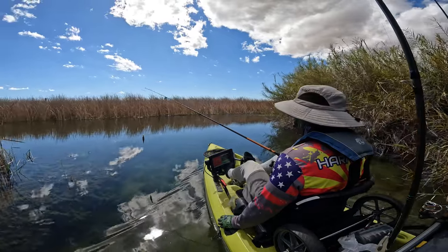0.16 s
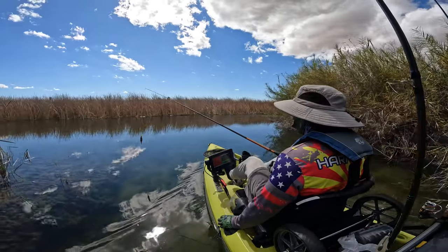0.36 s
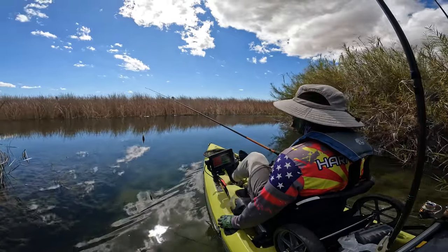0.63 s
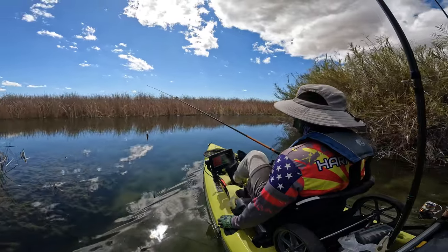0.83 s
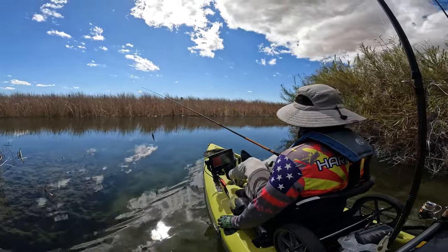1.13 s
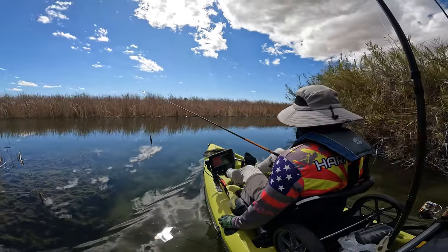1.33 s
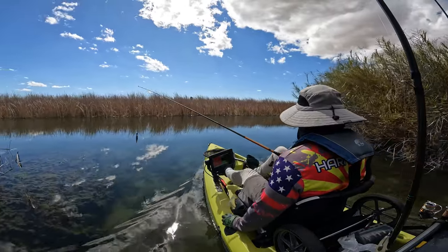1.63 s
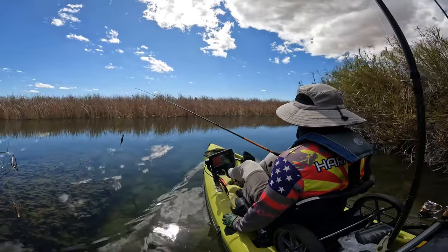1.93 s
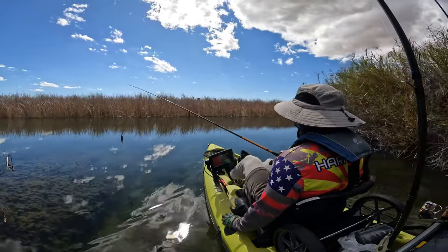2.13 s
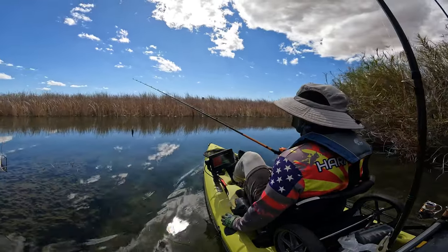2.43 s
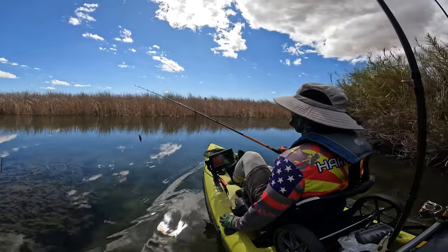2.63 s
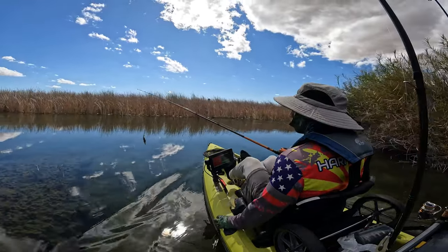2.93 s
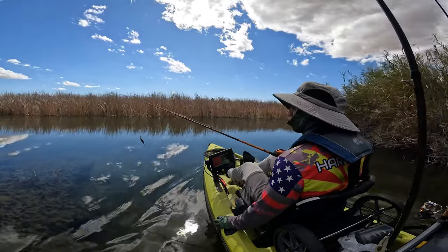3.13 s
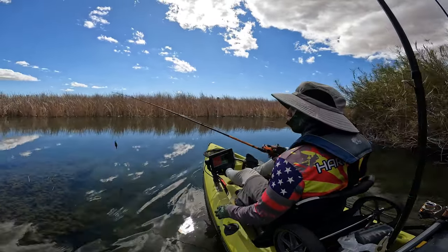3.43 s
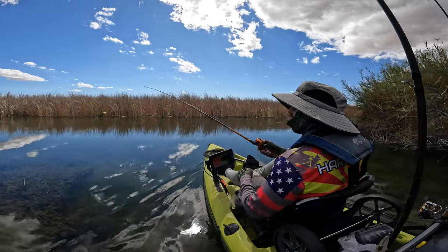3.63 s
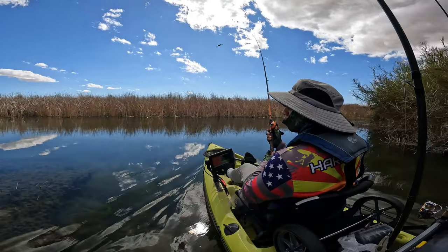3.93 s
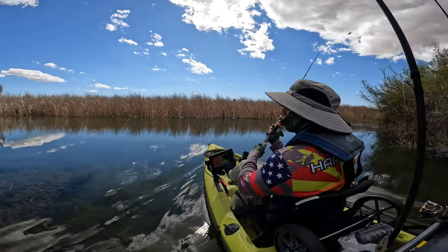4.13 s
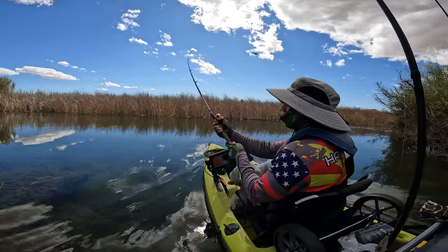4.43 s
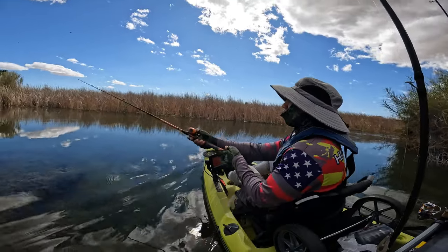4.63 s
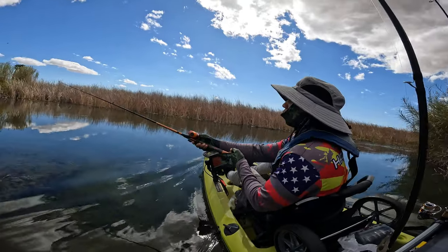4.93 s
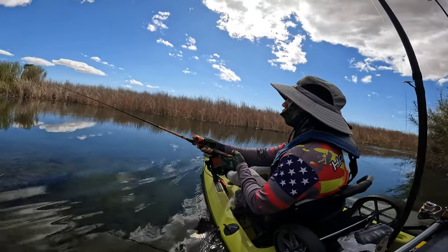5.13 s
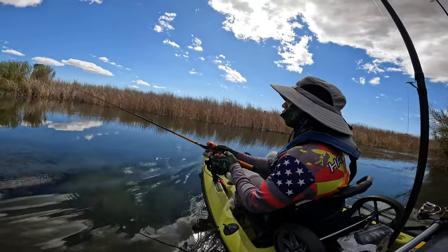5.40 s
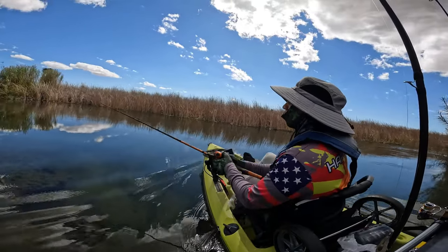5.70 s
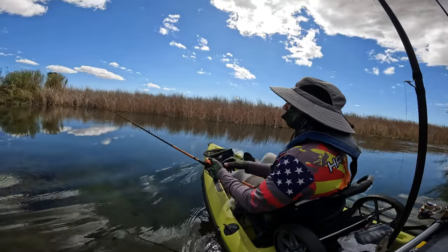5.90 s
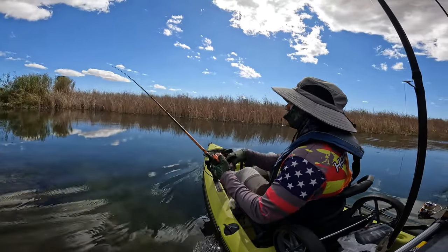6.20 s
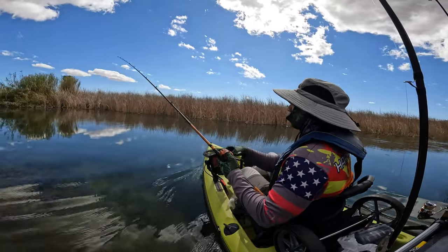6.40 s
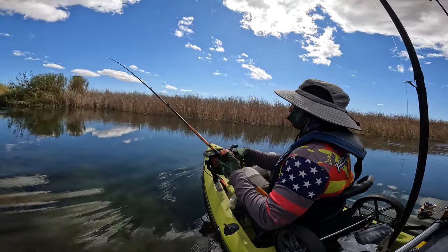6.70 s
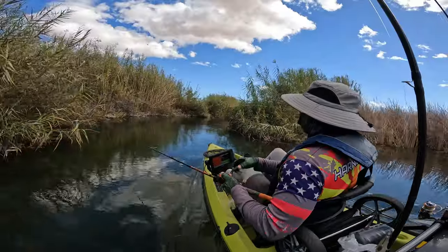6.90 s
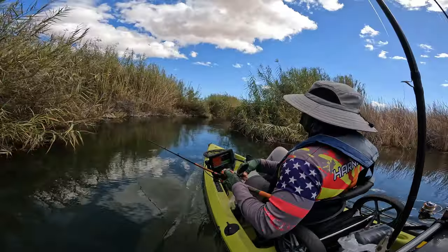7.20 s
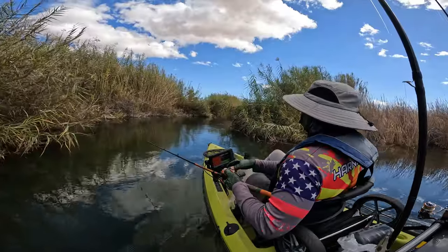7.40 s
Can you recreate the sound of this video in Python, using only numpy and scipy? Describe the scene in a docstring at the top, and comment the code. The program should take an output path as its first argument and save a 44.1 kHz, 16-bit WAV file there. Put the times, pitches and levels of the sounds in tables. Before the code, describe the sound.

A fishing reel clicks and its spool whistles through a cast, then winds, amid kayak knocks, creaks and low wind rumble.

```python
"""An angler drifts in a plastic kayak on still water, a light wind rumbling on the microphone. The seat
creaks slip by slip, cloth rustles, and pedalling knocks the hollow hull and sets it booming. Near 4 s the
reel's clutch snaps out and the cast follows: the rod swishes, the line slaps the guides and hisses away,
and the freed spool's bearings whistle as it slows. Just after 6 s the clutch snaps back in, the crank's
gears grind and whine, and the tackle gives a few last clicks."""
import sys
import numpy as np
from scipy import signal
from scipy.fft import rfft, irfft, next_fast_len
from scipy.io import wavfile

SR = 44100
rng = np.random.default_rng(int(sys.argv[2]) if len(sys.argv) > 2 else 0)


def int16_out(signal):
    """Quantize to a 16-bit WAV file."""
    q = np.round(np.clip(np.atleast_2d(signal).T, -1, 1) * 32767)
    wavfile.write(sys.argv[1], SR, q.astype(np.int16))


N = 332993


def amp(db):
    return np.exp(np.asarray(db) * np.log(10) / 20)


def rms_one(x):
    return x / np.sqrt(np.mean(x ** 2) + 1e-20)


def pan(db):
    """Left and right gains, the left louder by db (a number or a curve)."""
    return amp(np.array([[.5], [-.5]]) * db)


def curves(rows):
    """One automation curve for each column after the first, which holds the time."""
    times, *columns = np.transpose(rows)
    return [np.interp(np.arange(N) / SR, times, column) for column in columns]


def gate(rows, fade_s):
    """Fully open from the first row's time to the last, fading shut outside."""
    t = np.arange(N) / SR
    return np.clip(np.minimum(t - rows[0][0], rows[-1][0] - t) / fade_s + 1, 0, 1)


def at_hz(points, hz, outside=None):
    """Read a curve along a log-frequency axis."""
    point_hz, values = np.transpose(points)
    return np.interp(np.log(hz), np.log(point_hz), values, left=outside, right=outside)


def drift(rate_hz):
    """Smooth random modulation with a spread of about 1."""
    step = int(np.clip(SR / rate_hz / 30, 1, 200))
    pole = np.exp(-2 * np.pi * rate_hz * step / SR)
    slow = signal.lfilter([1], [1, -2 * pole, pole ** 2], rng.standard_normal(N // step + 502))[500:]
    return np.interp(np.arange(N) / step, np.arange(len(slow)), rms_one(slow))


def soften(x, hz):
    """A gentle two-pole low-pass."""
    pole = np.exp(-2 * np.pi * hz / SR)
    return signal.lfilter([(1 - pole) ** 2], [1, -2 * pole, pole ** 2], x)


def resonance(x, hz, width_hz):
    r = np.exp(-np.pi * width_hz / SR)
    return signal.lfilter([1 - r, 0, r - 1], [1, -2 * r * np.cos(2 * np.pi * hz / SR), r * r], x)


def wavering(hz, scatter_hz, rate_hz, flutter_db=3.5):
    """A sine roughened into a noisy band by random pitch and level flutter."""
    phase = 2 * np.pi * np.cumsum(hz + scatter_hz * drift(rate_hz)) / SR
    return np.sqrt(2) * np.sin(phase) * amp(flutter_db * drift(rate_hz / 2))


def noise_bed(spectrum, flicker_db, tilt_db=0, span=slice(None)):
    """Stereo noise in flickering third-octave bands, tilted by tilt_db per octave about 3 kHz."""
    # Stereo width. Each row: frequency in Hz, likeness of left and right (1 is mono).
    likeness = [(30, 0.58), (120, 1), (300, 0.95), (600, 0.36), (1200, 0.64), (3000, 0.79), (8000, 0.54),
                (13000, 0.26)]
    mid_side, power, white = np.zeros((2, N)), 0, rng.standard_normal((2, 2, N))
    octaves = np.log2(spectrum[-1][0] / spectrum[0][0])
    edges = spectrum[0][0] * 2 ** np.arange(0, octaves + .01, 1 / 3)
    flicker = [amp(flicker_db * drift(11.1)) for _ in range(3)]
    for k, (low, high) in enumerate(zip(edges, edges[1:])):
        hz = np.sqrt(low * high)
        band_db, alike = at_hz(spectrum, hz, outside=-90), at_hz(likeness, hz)
        if band_db < -55:   # too faint to hear
            continue
        band_pass = signal.butter(2, [low, high], "band", fs=SR, output="sos")
        band = signal.sosfilt(band_pass, white[k % 2][:, span])
        gain = amp(band_db + tilt_db * np.log2(hz / 3000)) * flicker[k % 3]
        mid_side[:, span] += gain[span] * band * np.sqrt([[1 + alike], [1 - alike]])
        power += amp(2 * band_db) * (high - low) * 2 / SR
    mid, side = mid_side
    return (mid + side * [[1], [-1]]) / np.sqrt(power)


def struck(hits, modes, contact_s, crack_db, gain_db, detune, reach, spread_s=0):
    """Each blow chatters for a moment, favours the modes near its centre and adds a dry crack."""
    out, t = np.zeros((2, N)), np.arange(SR // 10) / SR
    hz, mode_db, t60 = np.transpose(modes)[:, :, None]
    age = np.maximum(t - spread_s * np.sqrt(1000 / hz), 0)   # each mode starts when its wave arrives
    polarity = (-1) ** np.arange(len(modes))[:, None]   # neighbouring modes push opposite ways
    variations = rng.standard_normal((len(hits), 2, len(modes), 1))
    chatters = rng.standard_normal((len(hits), 900))
    pressure = np.exp(-t[:900] / contact_s) * (1 - np.exp(-t[:900] / (0.17 * contact_s)))
    for (start, db, centre_hz, focus_db, pan_db), (luck, grip), chatter in zip(hits, variations, chatters):
        contact = soften(chatter * pressure, reach * centre_hz)
        strength_db = mode_db - focus_db * np.abs(np.log2(hz / centre_hz)) + 2.5 * luck
        ring_hz = hz * (1 + detune * grip)   # grip and load shift the modes a little
        rings = polarity * amp(strength_db - 60 * age / t60) * np.sin(2 * np.pi * ring_hz * age)
        blow = signal.fftconvolve(rings.sum(axis=0), contact)[:len(t)]
        blow /= np.abs(blow).max()
        blow[:900] += amp(crack_db) * soften(contact, 0.67 * centre_hz) / np.abs(contact).max()
        at = round(start * SR)
        out[:, at:at + len(t)] += (pan(pan_db) * amp(db + gain_db) * blow)[:, :N - at]
    return out


def deck_echo(hits, send_db, t60_s):
    """Deck, water and reeds scatter each blow into a short dull tail."""
    t = np.arange(SR // 8) / SR
    tail = signal.lfilter([.5], [1, -.5], rng.standard_normal((2, len(t)))) * amp(-60 * t / t60_s)
    return hits + amp(send_db) * signal.fftconvolve(hits, tail, axes=1)[:, :N]


def far_shore():
    """A faint wash of reeds and water far off."""
    # Colour of the wash. Each row: frequency in Hz, relative level in dB.
    colour = [(180, -46), (300, -8.5), (484, -13.5), (849, -15.5), (1330, -7), (1730, -15), (3450, -22.5),
              (5480, -20), (6900, -20.5), (8420, -33), (12100, -25), (14000, -62), (15500, -60)]
    return amp(-71.5) * noise_bed(colour, flicker_db=1.2) * pan(1.5)


def wind_and_shoves():
    """Wind rumbles on the microphone; each shove booms the hull's air mode and sloshes the water."""
    # Gusts. Each row: time in seconds, rumble level in dB, left over right in dB.
    gusts = [(0.0, -50.5, -1.5), (0.67, -43.5, -2), (1.05, -53, -2.5), (1.28, -39, -3.5), (1.43, -48.5, -2),
             (2.14, -47.5, -2), (2.21, -35, -3), (2.27, -47, -0.5), (2.67, -52, -1.5), (3.09, -30, -2),
             (3.17, -58, -6.5), (3.24, -36.5, 3.5), (3.72, -43, 0), (4.31, -45, -2.5), (5.36, -43.5, 0.5),
             (5.66, -66.5, -5.5), (5.99, -35, -3), (6.75, -53, -4.5), (6.9, -36, -3), (6.96, -42.5, -4),
             (7.25, -33.5, -5), (7.55, -40.5, 0)]
    # Colour of the rumble. Each row: frequency in Hz, relative level in dB.
    rumble_colour = [(8.8, -25), (15, 6.5), (27, -7), (43, -1), (127, -27.5), (172, -25.5), (200, -59),
                     (260, -87), (440, -120)]
    # Colour of wind buffeting and slosh alike. Each row: frequency in Hz, relative level in dB.
    slosh_colour = [(82, 0.5), (140, -0.5), (227, -1), (264, -2.5), (349, -15), (553, -23), (1000, -33.5),
                    (1300, -47.5), (2200, -120)]
    # Feet and body shoving the hull. Each row: start and hold in seconds, boom and slosh levels in dB.
    shoves = [(-0.01, 0.098, -42, -55.5), (0.349, 0.015, -62, -50), (0.459, 0.01, -47, -53.5),
              (1.046, 0.044, -34.5, -46), (1.209, 0.03, -51, -47), (1.788, 0.049, -38, -49.5),
              (2.166, 0.035, -68, -58.5), (2.488, 0.17, -38, -57), (2.761, 0.085, -52, -55.5),
              (2.925, 0.038, -36, -56.5), (2.94, 0.015, -43, -44), (3.07, 0.018, -56, -76),
              (3.505, 0.27, -72, -72), (3.905, 0.2, -51, -60), (4.581, 0.26, -46, -55.5),
              (5.432, 0.01, -72, -84), (5.765, 0.013, -43, -77), (5.914, 0.11, -47.5, -64),
              (6.553, 0.07, -45.5, -78), (6.904, 0.013, -65, -58.5), (7.094, 0.086, -44.5, -73),
              (7.267, 0.21, -41.5, -53.5)]
    boom_hz, rise_s, fall_s = 114, 0.024, 0.047
    t = np.arange(N) / SR
    rumble_db, pan_db = curves(gusts)
    boom_level = amp(-57.5)   # between shoves the hull still murmurs
    slosh_level = amp(-65 + 0.029 * (rumble_db - rumble_db.mean()))   # buffeting barely follows the gusts
    for start, hold, boom_db, slosh_db in shoves:
        swell = np.exp(np.minimum(0, np.minimum((t - start) / rise_s, (start + hold - t) / fall_s)))
        boom_level = boom_level + amp(boom_db) * swell
        slosh_level = slosh_level + amp(slosh_db) * swell
    cavity = resonance(rng.standard_normal(N), boom_hz, width_hz=14)
    boom = boom_level * rms_one(resonance(cavity, boom_hz, width_hz=23)) * pan(8)
    rumble = amp(rumble_db) * noise_bed(rumble_colour, flicker_db=4)
    slosh = slosh_level * noise_bed(slosh_colour, flicker_db=5.5)
    return pan(pan_db) * (rumble + boom + slosh)


def mount_thumps():
    """Blows come through the mount as a few low swings under a bell-shaped envelope."""
    # Thumps. Each row: time in seconds, level in dB, pitch in Hz, width in seconds, left over right in dB.
    thumps = [(4.686, -27, 253, 0.0029, -1), (4.699, -35.5, 251, 0.016, -2), (6.091, -19, 53.7, 0.0065, -6),
              (6.261, -47, 400, 0.0041, 1), (6.891, -12.5, 63, 0.003, -6)]
    out = 0
    for time, db, hz, width_s, pan_db in thumps:
        t = np.arange(N) / SR - time
        bell = amp(db) * np.exp(-(t / width_s) ** 2)
        out = out + bell * np.cos(2 * np.pi * hz * t + 1.65) * pan(pan_db)
    return out


def rustle():
    """Cloth and line rub in a few stretches, now and then with a squeak."""
    # Rubs. Each row: start and length in seconds, level and fade in dB, brightness in dB per octave,
    # squeak in dB relative to the level.
    rubs = [(0.0, 0.18, -70.5, 7, 1, -28), (2.477, 0.15, -68, 3, 0.5, 0.5), (2.847, 0.13, -67, 1, 0, -19),
            (3.512, 0.027, -85, 18, 13, -30), (4.207, 0.055, -70, 14, 8, -30),
            (5.85, 0.36, -58.5, 13.5, 1.5, -25), (6.985, 0.76, -67.5, 1, 0.5, -34),
            (7.094, 0.015, -72, 18, 2.5, -32), (7.19, 0.039, -82, 3, 3.5, -30),
            (7.512, 0.017, -72, 20, 3, -26)]
    # Colour of the cloth. Each row: frequency in Hz, relative level in dB.
    colour = [(900, -3), (1500, 1), (2600, -3.5), (3300, -6.5), (4000, -7), (6500, -10), (10000, -20),
              (12500, -18), (15000, -73)]
    level, tilt_db, squeak_level = np.zeros((3, N))
    for start, length, db, fade_db, bright_db, squeak_db in rubs:
        ramp = [(start, db), (start + length, db - fade_db)]
        rubbing = gate(ramp, fade_s=0.03)
        gain = rubbing * amp(curves(ramp)[0])
        level += gain
        tilt_db += rubbing * bright_db
        squeak_level += gain * amp(squeak_db)
    cloth = level * noise_bed(colour, flicker_db=1.8, tilt_db=tilt_db)
    return cloth + squeak_level * wavering(3330, scatter_hz=330, rate_hz=700, flutter_db=2.5)


def seat_creaks():
    """The seat sticks and slips, each slip ringing a frame that has no bass."""
    # Slips. Each row: start in seconds, relative level in dB, centre in Hz.
    slips = [(0.019, -48, 1970), (0.047, -48.5, 1980), (0.071, -54, 1920), (0.0922, -51.5, 1870),
             (0.112, -56, 1700), (0.1326, -57, 1890), (0.543, -63.5, 2100), (0.572, -64, 2080),
             (0.5997, -63, 2370), (0.626, -53.5, 2050), (0.661, -62, 1920), (0.698, -56.5, 1700),
             (0.755, -56, 2150), (0.819, -50.5, 2370), (0.876, -49.5, 2140), (1.1453, -48.5, 1490),
             (1.3948, -58, 1770), (1.8264, -68, 1890), (2.339, -52.5, 1490), (2.385, -52, 2200),
             (2.4148, -48.5, 2180), (2.45, -50.5, 2210), (2.7707, -54, 1700), (3.1477, -52.5, 1670),
             (3.1816, -55.5, 1710), (3.581, -61, 1720)]
    # Seat modes. Each row: frequency in Hz, relative level in dB, seconds to fall 60 dB.
    modes = [(1380, -2, 0.02), (1880, 2, 0.012), (2200, 3, 0.01), (2600, 0, 0.007), (3420, -3, 0.006),
             (4470, -5, 0.005), (5800, -8, .004)]
    focus_db, pan_db = 7, -1.5
    hits = [(*slip, focus_db, pan_db) for slip in slips]
    creaks = struck(hits, modes, contact_s=0.00048, crack_db=-30, gain_db=5, detune=0.04, reach=2.4)
    return signal.sosfilt(signal.butter(4, 1150, "high", fs=SR, output="sos"), creaks)


def hull_knocks():
    """Knocks send bending waves through the plastic hull, the high pitches arriving first."""
    # Knocks. Each row: time in seconds, relative level in dB, centre in Hz, left over right in dB.
    knocks = [(0.306, -32, 1520, 0), (0.312, -33, 463, -4), (0.45, -52, 538, 6), (1.109, -32.5, 1600, -2),
              (1.189, -42, 970, 2), (1.246, -43, 785, -4), (1.416, -34.5, 1760, -1), (1.438, -42, 1140, -3),
              (1.653, -44, 644, -1), (1.883, -42, 624, -3), (2.301, -38, 980, -1), (2.493, -45.5, 1170, -3),
              (2.773, -44.5, 340, -1), (2.844, -45, 450, 0), (2.852, -47.5, 1400, 1), (2.916, -38, 1080, 8),
              (2.928, -39.5, 790, 7.5), (2.939, -42, 1200, 0), (2.95, -42.5, 875, 3),
              (2.958, -32.5, 375, 1), (2.96, -49, 1490, -2), (2.974, -51, 557, -4.5),
              (3.066, -45, 1000, -3), (3.49, -44.5, 533, -2), (3.633, -44, 507, -4),
              (4.797, -31.5, 655, -6), (5.618, -42.5, 1840, -1), (5.99, -43, 710, -5),
              (6.867, -45.5, 700, -10)]
    # Hull modes. Each row: frequency in Hz, relative level in dB, seconds to fall 60 dB.
    modes = [(280, -9, 0.035), (361, -4, 0.045), (480, -7, 0.02), (612, -5, 0.02), (810, -4, 0.016),
             (990, -4, 0.013), (1255, -3, 0.011), (1500, -3, 0.009), (1880, -1, 0.008), (2320, -1, 0.006),
             (2750, -4, .004), (3400, -6, .004)]
    focus_db, spread_s = 4.5, 0.003   # a 1 kHz wave takes spread_s to arrive
    hits = [(time - spread_s / 2, db, hz, focus_db, pan_db) for time, db, hz, pan_db in knocks]
    return struck(hits, modes, contact_s=0.005, crack_db=-7, gain_db=-3.5, detune=0.11, reach=2.6,
                  spread_s=spread_s)


def rod_swish():
    """The rod sheds vortices: two broad bands that climb with its speed."""
    # The stroke. Each row: time in seconds, centre in Hz and level in dB of the upper band.
    stroke = [(4.44, 1120, -69), (4.57, 1150, -56.5), (4.635, 1409, -56.5), (4.69, 2660, -51),
              (4.74, 2705, -66.5)]
    hz, db = curves(stroke)
    upper = wavering(hz, scatter_hz=0.161 * hz, rate_hz=401)
    lower = wavering(0.52 * hz, scatter_hz=0.099 * hz, rate_hz=300)
    return gate(stroke, fade_s=0.086) * amp(db) * (upper + 0.54 * lower)


def reel_clicks():
    """Clutch, handle, tackle and slapping line ring a body too small to radiate bass."""
    # The clutch snapping out, then back in. Each row: start in seconds, relative level in dB,
    # centre in Hz, fall-off from the centre in dB per octave, left over right in dB.
    clutch = [(3.9812, -44, 3480, -4, -6), (3.9887, -20.5, 3750, 24, -0.5), (3.9918, -26, 4570, -6, 5),
              (3.9945, -21.5, 2200, 3, -6), (6.2435, -36, 3500, 7, 3), (6.249, -36, 3000, 5, 1.5),
              (6.2548, -18.5, 3500, -5.5, 4), (6.2573, -11, 4500, -6, 1.5), (6.2592, -12, 5200, 2.5, 6),
              (6.2628, -11.5, 1890, 13, 1), (6.2652, -22, 1890, 15.5, -12), (6.269, -32, 3000, -1, 3)]
    # Handle and tackle. Each row: start in seconds, relative level in dB, centre in Hz,
    # left over right in dB.
    tackle = [(5.902, -37, 6750, 11.5), (5.9896, -31.5, 1820, 9.5), (6.2166, -41.5, 1570, -1),
              (6.513, -42.5, 1810, -2), (6.5398, -41.5, 1720, -1), (6.728, -38.5, 1750, 0.0),
              (6.748, -39, 1674, 1), (6.777, -42.5, 1750, -2), (6.866, -54, 7000, -3),
              (6.909, -43.5, 2520, -1), (6.9457, -55, 1670, -7), (6.9838, -42.5, 2900, 0),
              (7.08, -44, 2240, 0), (7.2793, -45.5, 3230, 2), (7.34, -41, 2690, 0), (7.409, -47, 2020, 0)]
    # Line slapping the rod guides. Each row: start in seconds, relative level in dB, centre in Hz.
    slaps = [(4.626, -34, 2300), (4.638, -33, 1490), (4.65, -25, 3740), (4.669, -29, 3370),
             (4.6868, -28.5, 2570)]
    # Reel modes. Each row: frequency in Hz, relative level in dB, seconds to fall 60 dB.
    modes = [(720, -15, 0.03), (1098, -9, 0.066), (1580, -15, 0.021), (1880, 10, 0.0098),
             (1890, 17, 0.0083), (2320, -8, 0.038), (2570, 10.5, 0.013), (3210, 9, 0.016),
             (3720, 3.5, 0.011), (4630, 13.5, 0.006), (5190, 11, 0.012), (5660, 15.5, 0.0065),
             (7485, 7.5, 0.01), (9400, 12.5, 0.0035), (11300, 0.5, 0.0066)]
    tackle_focus_db, slap_focus_db = 19, 45
    hits = [(start, db, hz, tackle_focus_db, pan_db) for start, db, hz, pan_db in tackle]
    hits += [(*slap, slap_focus_db, 0) for slap in slaps]
    snaps = struck(clutch, modes, contact_s=0.0013, crack_db=-32, gain_db=0, detune=0.03, reach=3.3)
    ticks = struck(hits, modes, contact_s=0.003, crack_db=-36, gain_db=-1, detune=0.03, reach=2.5)
    clicks = deck_echo(snaps + ticks, send_db=-43, t60_s=0.23)
    return signal.sosfilt(signal.butter(3, 800, "high", fs=SR, output="sos"), clicks)


def crank():
    """Gear teeth scrape into the case, the pinion rings, and two thin whines wander with the hand."""
    # Cranking. Each row: time in seconds, low whine's pitch in Hz and level in dB, grind level in dB.
    cranking = [(6.27, 2570, -71, -43), (6.295, 2580, -66, -58), (6.33, 2420, -75, -56.5),
                (6.404, 2417, -60, -55), (6.47, 2430, -64, -58.5), (6.53, 3100, -72, -52),
                (6.585, 3310, -66, -57.5), (6.606, 2696, -62.5, -57.5), (6.7, 2797, -61, -58.5),
                (6.75, 2730, -73, -56.5), (6.86, 2600, -69, -59.5), (6.885, 2560, -59, -60.5),
                (6.95, 2660, -74, -55.5)]
    # Gear case resonances. Each row: centre and width in Hz, relative level in dB.
    case_modes = [(1180, 370, -3), (1750, 470, 1.5), (3100, 780, -3), (4670, 510, -1), (5900, 2400, -9)]
    # The high whine, leaping as the hand jerks. Each row: time in seconds, pitch in Hz.
    jerks = [(6.365, 5270), (6.385, 6040), (6.41, 5720), (6.428, 4580), (6.462, 4900), (6.478, 5890),
             (6.492, 5990), (6.506, 7580), (6.525, 5940), (6.548, 4850), (6.564, 5970), (6.6, 5630),
             (6.635, 5680), (6.648, 6530), (6.664, 5900), (6.7, 5720), (6.712, 7040), (6.724, 6900),
             (6.745, 6560), (6.756, 6050), (6.772, 6600), (6.82, 5860), (6.846, 6250), (6.868, 5730)]
    low_hz, low_db, grind_db = curves(cranking)
    high_hz, = curves(jerks)
    mid, side = rng.standard_normal((2, N)) * amp(1.2 * drift(120))
    teeth = mid + 0.34 * side * [[1], [-1]]
    case = sum((-1) ** k * resonance(teeth, hz, width_hz) * amp(db + 2.2 * drift(17))
               for k, (hz, width_hz, db) in enumerate(case_modes))
    muffle = signal.butter(2, 8500, fs=SR, output="sos")   # the case dulls the top
    grind = signal.sosfilt(muffle, rms_one(case))
    low_whine = wavering(low_hz, scatter_hz=115, rate_hz=150) * amp(low_db + 2 * drift(33))
    pinion = amp(-18 + 5 * drift(18)) * wavering(4670, scatter_hz=90, rate_hz=200)
    high_whine = wavering(high_hz, scatter_hz=115, rate_hz=197) * amp(-69 + 2 * drift(16))
    gears = amp(grind_db) * (grind + pinion) + low_whine + gate(jerks, fade_s=0.01) * high_whine
    return gate(cranking, fade_s=0.036) * gears * pan(1.4)


def line_hiss(hiss_db, angle, ring_gate):
    """Line hisses through the guides, pulsing with each turn; frame and guides ring faintly under it."""
    # Colour of the running line. Each row: frequency in Hz, relative level in dB.
    colour = [(700, -58), (1200, -14.5), (2000, -10), (2500, -11.5), (3500, -10.5), (4800, -13.5),
              (6300, -19), (7300, -21.5), (9000, 0.5), (11000, -27), (12300, -6), (13000, -45),
              (14500, -34), (15500, -36)]
    # Brightness of the hiss. Each row: time in seconds, tilt in dB per octave.
    brightness = [(4.5, -5.5), (4.58, -2), (4.95, 3), (5.5, 0.5), (5.83, -5)]
    tilt_db, = curves(brightness)
    hiss = noise_bed(colour, flicker_db=2.5, tilt_db=tilt_db, span=slice(4 * SR, 6 * SR))
    mid_ring = wavering(7350, scatter_hz=354, rate_hz=483)
    low_ring = 1.4 * wavering(2000, scatter_hz=120.8, rate_hz=184)
    pulse = rms_one(np.exp(0.61 * np.cos(angle)))
    top_ring = 1.35 * amp(tilt_db) * pulse * wavering(11700, scatter_hz=450, rate_hz=800)
    rings = ring_gate * amp(hiss_db - 12.5) * (low_ring + mid_ring + top_ring)
    return amp(hiss_db + np.cos(angle)) * hiss + rings


def free_spool():
    """Two bearings whistle under a thin squeal as the line runs out; each turn swings their pitch."""
    # The spool's run. Each row: time in seconds, first whistle's pitch in Hz and level in dB,
    # second whistle's pitch in Hz and level in dB, line hiss level in dB.
    run = [(4.48, 5680, -100, 5400, -100, -65.5), (4.58, 8930, -58, 8520, -66, -52),
           (4.624, 9940, -37, 9540, -42, -41), (4.7, 10050, -37, 9150, -45, -48.5),
           (4.83, 9900, -38, 9300, -47.5, -51.5), (4.94, 9840, -39.5, 9590, -42.5, -51.5),
           (5.1, 9840, -44.5, 9250, -49.5, -55), (5.25, 9440, -48.5, 8500, -53.5, -56),
           (5.4, 9240, -53.5, 8360, -58.5, -58.5), (5.5, 9300, -56, 8450, -55.5, -59.5),
           (5.68, 8530, -56.5, 8150, -64, -60.5), (5.76, 8280, -58, 7900, -68, -58),
           (5.815, 8000, -69, 7500, -74, -55.5), (5.85, 6800, -70, 6300, -80, -70),
           (5.88, 4300, -68, 4200, -86, -86)]
    # Spool speed. Each row: time in seconds, turns per second.
    speed = [(4.5, 200), (4.62, 236), (4.7, 241), (4.83, 236), (4.92, 216), (5.02, 194), (5.27, 148),
             (5.5, 124), (5.71, 102), (5.9, 90)]
    first_hz, first_db, second_hz, second_db, hiss_db = curves(run)
    turns, = curves(speed)
    slowing = turns.max() / turns
    halvings = np.log2(slowing)
    angle = 2 * np.pi * np.cumsum(turns) / SR + 0.034 * drift(35)
    # two throbs a turn, the louder one on the upward swing
    throb = rms_one(np.abs(np.cos(angle)) * (1 + 0.37 * np.cos(angle)) + 0.79)
    swing_hz, scatter_hz = 290 * np.cos(angle) / slowing, 48 * slowing ** 1.5
    whistles = sum(amp(db) * throb * wavering(hz + swing_hz, scatter_hz, rate_hz=380, flutter_db=2.5)
                   for hz, db in [(first_hz, first_db), (second_hz, second_db)])
    # the squeal climbs and fades as the spool slows
    squeal_hz = 13850 + 500 * halvings + 420 * np.sin(angle)
    squeal_level = amp(first_db - 18 - 8 * halvings) * rms_one(np.exp(1.1 * np.cos(angle)))
    squeal = squeal_level * wavering(squeal_hz, scatter_hz=89.7, rate_hz=300, flutter_db=0)
    line = line_hiss(hiss_db, angle, ring_gate=gate(run[2:], fade_s=0.032))
    return gate(run, fade_s=0.03) * ((whistles + squeal) * pan(4.5) + line * pan(0.84))


def scene():
    """The kayak, the reel, the far shore and the angler's movements in one stereo mix."""
    boat = deck_echo(seat_creaks() + hull_knocks(), send_db=-31, t60_s=0.13)
    low_end = wind_and_shoves() + mount_thumps()
    reel = reel_clicks() + free_spool() + crank()
    return boat + low_end + reel + far_shore() + rustle() + rod_swish()


def record(dry):
    """The microphone's two ports hear slightly out of step; the top is cut away by 16 kHz."""
    # Phase between the ports. Each row: frequency in Hz, the left's lead in radians (negative lags).
    port_phase = [(60, -0.51), (260, -0.84), (780, -0.4), (2500, -0.66), (6000, -0.38), (15000, -0.74)]
    size = next_fast_len(N + 4096)
    hz = np.arange(size // 2 + 1) * SR / size
    phase_shift = np.exp(1j * at_hz(port_phase, hz + 1))
    left = irfft(rfft(dry[0], size) * phase_shift, size)[:N]
    high_cut = signal.cheby2(12, 70, 16000, fs=SR, output="sos")
    return signal.sosfilt(high_cut, np.stack([left, dry[1]]))


dry = scene()
out = record(dry)
int16_out(out)
```